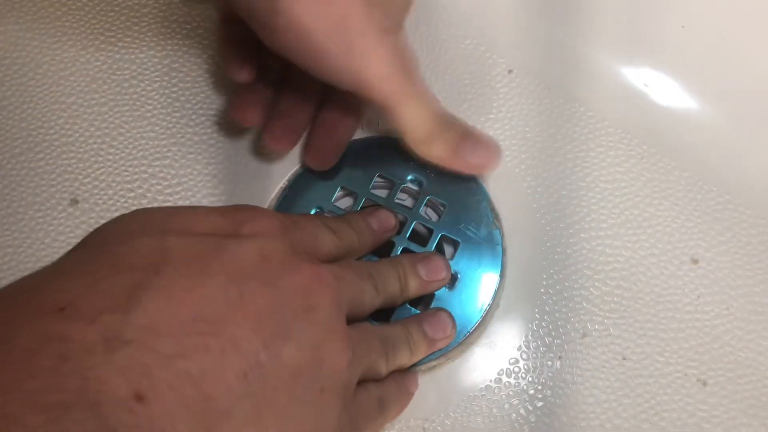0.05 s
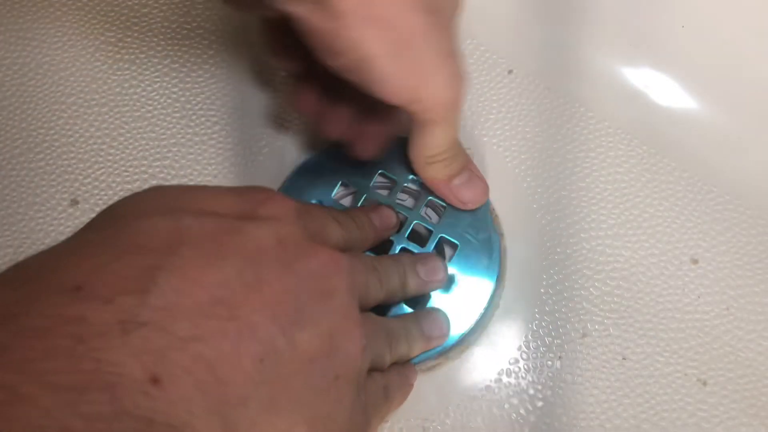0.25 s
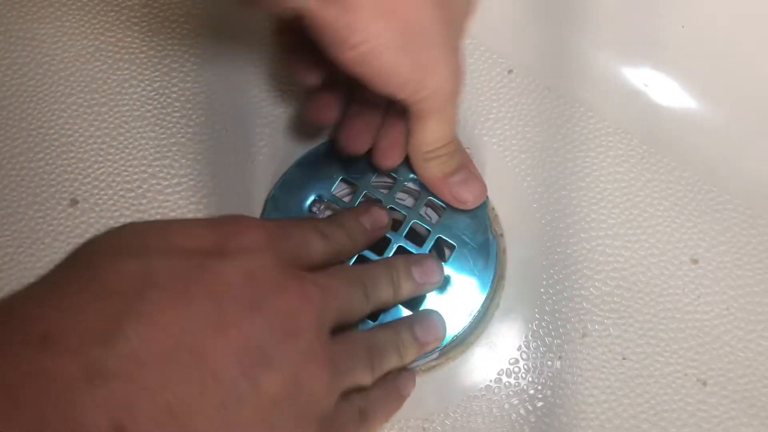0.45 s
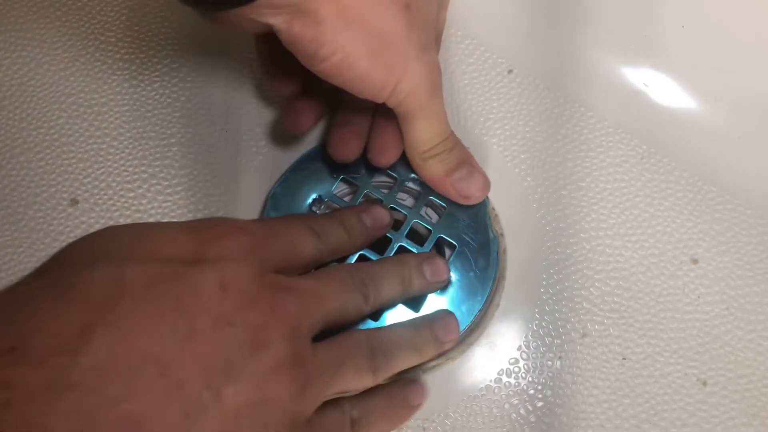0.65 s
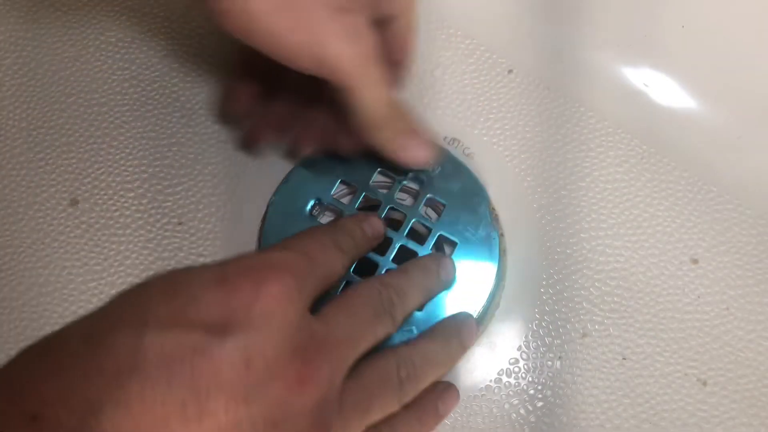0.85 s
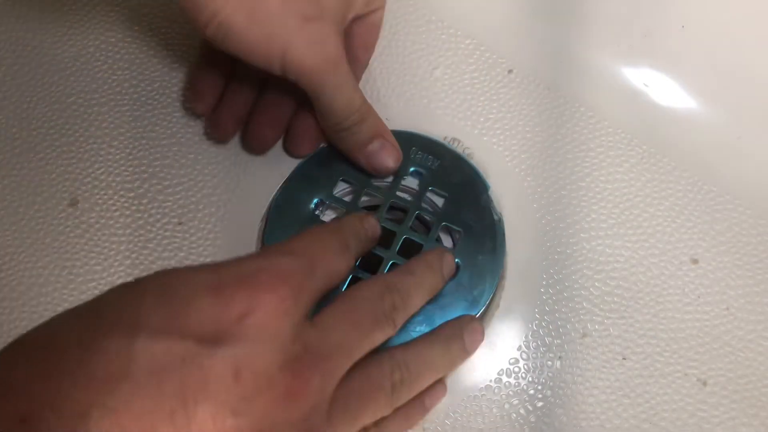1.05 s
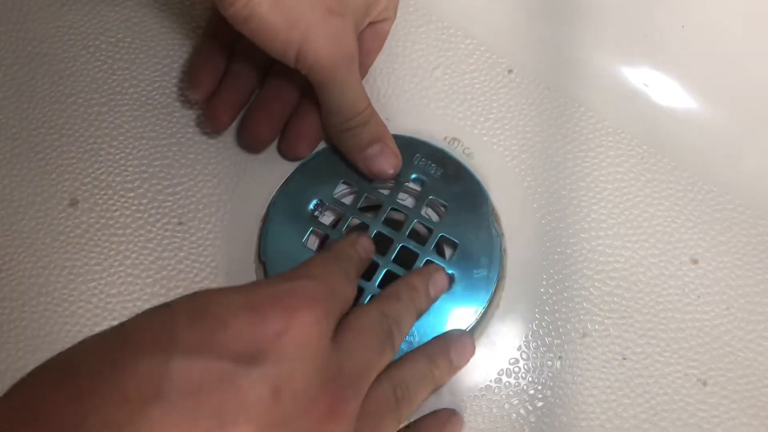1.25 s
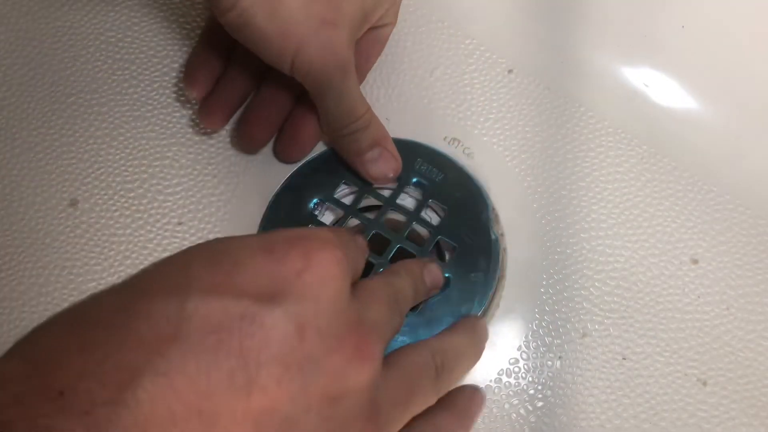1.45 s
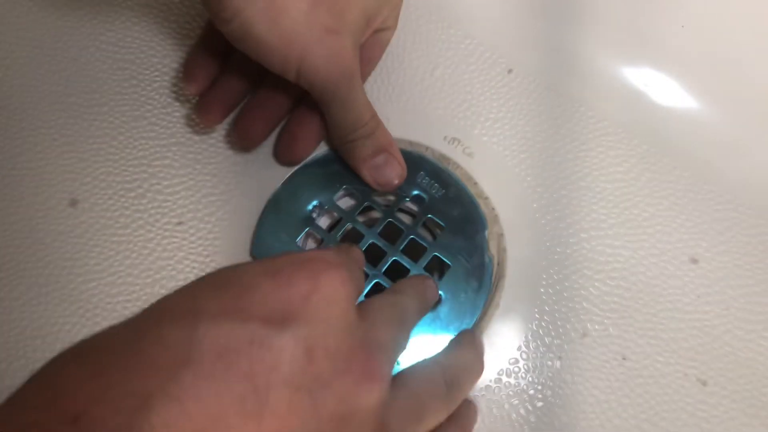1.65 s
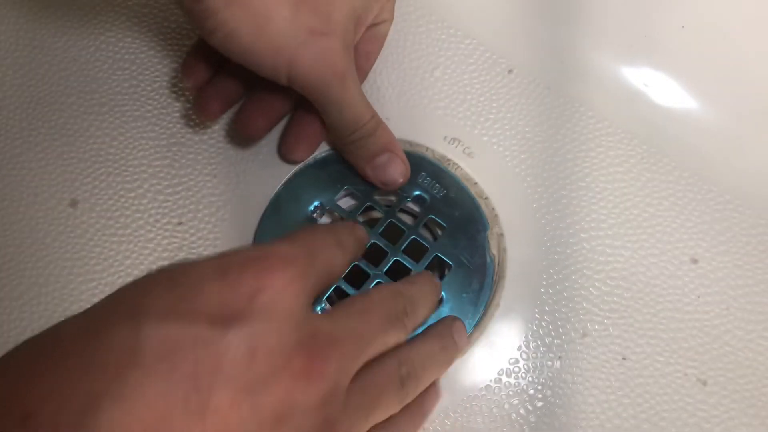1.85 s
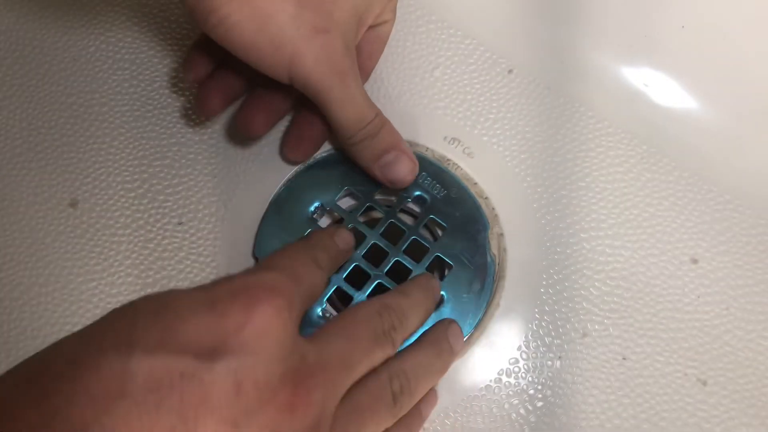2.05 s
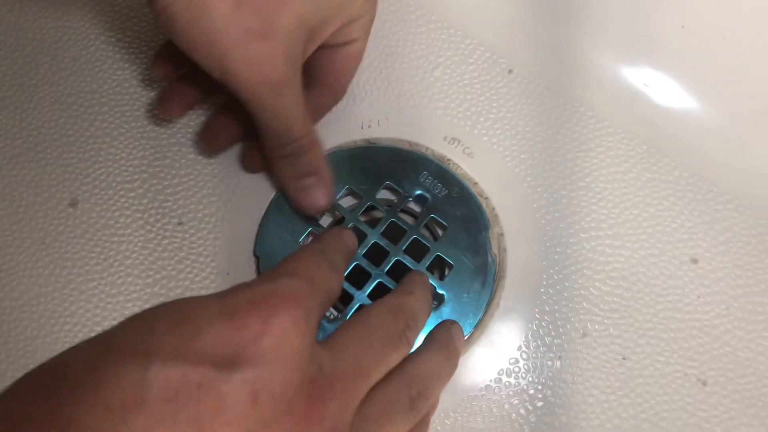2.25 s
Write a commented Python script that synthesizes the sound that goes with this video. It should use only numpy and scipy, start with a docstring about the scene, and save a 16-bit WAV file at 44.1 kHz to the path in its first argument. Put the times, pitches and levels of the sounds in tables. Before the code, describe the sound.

A metal drain grate snaps loudly against a hollow plastic shower tray, then scrapes in short jerks and lands with a softer, boomy clack, amid faint ticks and skin rubs, close-miked in a small tiled bathroom.

```python
"""A hard metallic snap over a hollow plastic knock, then a scrape in jerks, then a softer clack with
a deep boom, among faint ticks: fingers press a metal drain grate into a plastic shower tray. Contacts
are noise cracks plus decaying grate and tray modes, with low tray thuds. Scrapes are jerks of banded
noise, skin slides are soft-edged hiss, and a whistling hiss is noise on a moving pitch. A small tiled
room answers through decaying noise tails, over a low hum of the house and faint air, both coloured noise."""
import sys
import numpy as np
from scipy import signal
from scipy.fft import rfft, irfft, next_fast_len
from scipy.io import wavfile
from scipy.ndimage import map_coordinates

SR = 44100
rng = np.random.default_rng(int(sys.argv[2]) if len(sys.argv) > 2 else 0)


def int16_out(signal):
    """Quantize to a 16-bit WAV file."""
    q = np.round(np.clip(np.atleast_2d(signal).T, -1, 1) * 32767)
    wavfile.write(sys.argv[1], SR, q.astype(np.int16))


N = 101429
T = np.arange(N) / SR


def amp(db):
    """dB to gain."""
    return 10 ** (np.asarray(db) / 20)


def unit(x):
    """Scaled to rms 1."""
    return x / np.sqrt(np.mean(x ** 2) + 1e-20)


def along(points, hz):
    """Interpolates (Hz, value) points on a log frequency axis."""
    point_hz, values = np.transpose(points)
    return np.interp(np.log(hz + 1), np.log(point_hz + 1), values)


def filtered(x, response):
    """Multiplies the spectrum of x by a response of frequency."""
    m = next_fast_len(len(x) + 8192)
    spectrum = rfft(x, m) * response(np.fft.rfftfreq(m, 1 / SR))
    return irfft(spectrum, m)[:len(x)]


def low_pass(x, top_hz, order):
    """Causal Butterworth low-pass."""
    sos = signal.butter(order, min(top_hz, SR / 2.1), fs=SR, output="sos")
    return signal.sosfilt(sos, x)


def band(x, low_hz, top_hz, order):
    """Causal band: second order below, the given order above."""
    return filtered(low_pass(x, top_hz, order), lambda hz: (1j * hz / (low_hz + 1j * hz)) ** 2)


def wobble(knots_per_s):
    """Smooth random curve through normal-distributed knots."""
    knots = rng.standard_normal(int(N * 2000 / SR))
    return map_coordinates(knots, [np.cumsum(knots_per_s + 0 * T) / SR])


def hiss(colour):
    """Coloured noise of rms 1."""
    return unit(filtered(rng.standard_normal(N), lambda hz: amp(along(colour, hz))))


def gate(start_s, length_s, edge_s):
    """Linear rise, hold, linear fall."""
    rise = np.clip((T - start_s) / edge_s + .5, 0, 1)
    fall = np.clip((start_s + length_s - T) / edge_s + .5, 0, 1)
    return rise * fall


def add(out, start_s, x):
    """Mixes x into out from start_s."""
    part = out[round(start_s * SR):][:len(x)]
    part += x[:len(part)]


SCATTER_DB = 3.5  # standard deviation of mode level, blow to blow


def ringing(modes, centre_hz, octaves, rise_cycles, phase_scatter_turns, blur_hz=0):
    """Decaying modes, 6 dB down at the given octaves from the blow's centre; blur makes phase wander."""
    hz, db, t60_s = np.transpose(modes)[:, :, None]
    t = T[:SR // 3]
    db = db - 6 * (np.log2(hz / centre_hz) / octaves) ** 2
    db = db + SCATTER_DB * rng.standard_normal(hz.shape)
    phase = 2 * np.pi * (hz * t + phase_scatter_turns * rng.random(hz.shape))
    if blur_hz:
        steps = rng.standard_normal(phase.shape)
        phase = phase + np.sqrt(2 * np.pi * blur_hz / SR) * np.cumsum(steps, axis=1)
    envelope = amp(db - 60 * t / t60_s) * (1 - np.exp(-t * hz / rise_cycles))
    return np.sum(envelope * np.sin(phase), axis=0)


# Hum level over time. Each row: time in seconds, level in dB.
HUM_LEVEL = [(0, -48), (.7, -50), (1.2, -45), (1.35, -47), (1.6, -45), (1.96, -47.5), (2.3, -42.5)]
# Hum spectrum. Each row: frequency in Hz, relative density in dB per Hz.
HUM_SPECTRUM = [(15, -69), (25, -41.5), (50, 0.5), (108, 5), (160, -7.5), (303, -12.5), (330, -25),
                (424, -19.5), (487, -19.5), (700, -32.5), (910, -95), (1540, -120)]


def house_hum():
    """Low-frequency coloured noise of slowly moving level."""
    level_db = np.interp(T, *np.transpose(HUM_LEVEL))
    return amp(level_db) * hiss(HUM_SPECTRUM)


# Air spectrum. Each row: frequency in Hz, relative density in dB per Hz.
AIR_SPECTRUM = [(290, -34.5), (500, 12.5), (1610, 1.5), (2260, -12), (2650, -10.5), (4050, -5),
                (8420, -13.5), (13800, -13), (16500, -28.5)]
AIR_DB = -67


def air():
    """Faint coloured noise, its level wavering slightly."""
    return amp(AIR_DB + 0.48 * wobble(3.2)) * hiss(AIR_SPECTRUM)


# Room decay. Each row: frequency in Hz, t60 in seconds.
ROOM_DECAY = [(100, 0.54), (300, 0.39), (700, 0.5), (1500, 0.55), (3000, 0.47), (6000, .42), (11000, 0.32),
              (16000, 0.44)]
# Room level. Each row: frequency in Hz, tail level in dB against the direct sound.
ROOM_LEVEL = [(100, -6), (400, -4.5), (1000, -3), (2500, -4.5), (6000, -6.5), (10000, -16), (15000, -15)]


def bathroom(x):
    """Tiled walls: noise tails decay per frequency, a fresh tail for each eighth of a second of input."""
    out, step = np.zeros(N), SR // 8
    for start in range(0, N, step):
        hz, t, z = signal.stft(rng.standard_normal(SR * 3 // 4), SR, nperseg=256)
        fall = amp(-60 * t / along(ROOM_DECAY, hz)[:, None])
        fall /= np.linalg.norm(fall, axis=1, keepdims=True)
        fall *= amp(along(ROOM_LEVEL, hz))[:, None]
        tail = signal.istft(z * fall, SR, nperseg=256)[1] / np.sqrt(128)
        add(out, start / SR + .003, signal.fftconvolve(x[start:start + step], tail))  # 3 ms delay
    return out


# Whistling hiss. Each row: time in seconds, pitch in Hz, width in Hz (knots per second), level in dB.
WHISTLE_PATH = [(0, 1312, 897, -45), (.05, 1348, 595, -44.5), (0.111, 1400, 624, -60),
                (0.162, 1600, 604, -53.5), (0.239, 1800, 336, -59.5), (0.3, 1800, 297.6, -69),
                (2.079, 1656, 298.6, -96.5), (2.16, 1632, 451.6, -63.5), (2.271, 1758, 407, -54),
                (2.3, 1600, 250, -63)]


def whistle():
    """Narrow noise band: two random envelopes on quadrature carriers of moving pitch."""
    time_s, *columns = np.transpose(WHISTLE_PATH)
    pitch_hz, width_hz, level_db = [np.interp(T, time_s, c) for c in columns]
    phase = 2 * np.pi * np.cumsum(pitch_hz) / SR
    return amp(level_db) * (wobble(width_hz) * np.sin(phase) + wobble(width_hz) * np.cos(phase))


# Skin spectrum before tilt. Each row: frequency in Hz, relative density in dB per Hz.
SKIN_SPECTRUM = [(1290, -8), (2200, -6.5), (2600, -8.5), (4030, -7), (5090, -11), (15100, -22),
                 (16000, -20.5)]
# Skin slides. Each row: start in seconds, length in seconds, level in dB before tilt,
# tilt in dB per octave about 6 kHz.
SKIN_SLIDES = [(0.008, 0.025, -50.5, -4.5), (0.029, 0.052, -52, 1.5), (0.095, 0.06, -53, 5.5),
               (0.176, 0.24, -57, -1.5), (0.446, 0.058, -54, 3), (0.646, 0.14, -62.5, -0.6),
               (0.855, 0.085, -43, -2), (0.996, 0.04, -53, 0), (1.099, 0.047, -61, 1),
               (1.151, 0.085, -62.5, 0.5), (1.343, 0.03, -62, 1.5), (1.433, 0.033, -49.5, 1.5),
               (1.873, 0.026, -54, 3), (2.129, 0.014, -58, 5), (2.18, 0.11, -55.5, 0.3)]
SLIDE_EDGE_S = 0.039


def slides():
    """Skin on metal: one fluctuating hiss, gated softly and tilted for each slide."""
    skin = amp(0.71 * wobble(120)) * hiss(SKIN_SPECTRUM)
    out = np.zeros(N)
    for start_s, length_s, db, tilt_db in SKIN_SLIDES:
        tilted = filtered(skin, lambda hz: amp(tilt_db * np.log2((hz + 1) / 6000)))
        out += amp(db) * gate(start_s, length_s, SLIDE_EDGE_S) ** 2 * tilted
    return out


# Rim scrapes. Each row: start in seconds, length in seconds, starting level in dB,
# bottom in Hz, top in Hz.
RIM_SCRAPES = [(.0, 0.092, -44.5, 581, 2860), (0.8586, 0.0053, -26, 1500, 4250),
               (0.8665, 0.0059, -24, 2170, 4240), (0.8763, 0.016, -23, 2170, 4250),
               (0.8894, .008, -25, 1800, 4190), (0.863, 0.085, -30, 345.6, 2650),
               (0.954, 0.039, -43, 300, 1670), (1.5042, 0.0035, -46, 3000, 13060),
               (1.513, 0.0044, -32, 2995, 14000)]
SCRAPE_EDGE_S, GRIT_DB, JERK_FALL_DB = 0.00031, 2.5, 7


def scrapes():
    """The rim scrapes in jerks: gritty noise in a band each, starting hard and easing off."""
    out = np.zeros(N)
    for start_s, length_s, db, low_hz, top_hz in RIM_SCRAPES:
        grit = rng.standard_normal(N) * amp(GRIT_DB * wobble(600))
        fall_db = JERK_FALL_DB * np.clip((T - start_s) / length_s, 0, 1)
        jerk = gate(start_s, length_s, SCRAPE_EDGE_S) * amp(db - fall_db)
        width_gain = np.sqrt(SR / 2 / (top_hz - low_hz))  # offsets the band's narrowness
        out += band(jerk * grit, low_hz, top_hz, order=16) * width_gain
    return out


# Tray modes. Each row: frequency in Hz, relative level in dB, t60 in seconds.
TRAY_MODES = [(107.6, 8, 0.21), (138, 13.5, 0.1), (200, 5, .09), (292.3, 6, 0.13), (392, -1.5, 0.079),
              (498, 0, 0.21), (533, 1, 0.098), (578.7, -1.5, 0.13), (723, 1, 0.17), (883, -2, 0.078),
              (1048, -2, 0.14), (1234, 4, 0.14), (1370, -2, 0.07), (1600, 3, 0.025)]
# Low thuds of the tray, many under the grate blows. Each row: start in seconds,
# level in dB added to the modes, centre in Hz.
TRAY_THUDS = [(0.099, -39, 132), (0.258, -18.5, 91), (0.774, -35.5, 141), (0.872, -33, 144),
              (0.929, -33, 132), (1.02, -30.5, 136), (1.388, -42.5, 139), (1.518, -12, 138),
              (1.69, -34.5, 142), (1.944, -45.5, 141.8), (2.193, -33, 131.6), (2.251, -43, 104)]
THUD_OCTAVES, THUD_RISE_CYCLES = 0.23, 1


def thuds():
    """Low thuds: tray modes near a low centre ring, all starting in phase."""
    tray = np.zeros(N)
    for start_s, db, centre_hz in TRAY_THUDS:
        notes = ringing(TRAY_MODES, centre_hz, THUD_OCTAVES, THUD_RISE_CYCLES, phase_scatter_turns=0)
        add(tray, start_s, amp(db) * notes)
    return tray


# Grate modes. Each row: frequency in Hz, relative level in dB, t60 in seconds.
GRATE_MODES = [(3103, 2.5, 0.025), (3800, 3.5, 0.024), (4160, -2.5, 0.02), (4910, 3, 0.024),
               (6436, 5.5, 0.03), (8000, 0.5, 0.039), (9500, -14, 0.023), (4960, -4.5, 0.0081),
               (10600, -17.5, 0.033), (11300, -12, .04), (13980, -5.5, .03)]
# Grate contacts. Each row: start in seconds, crack level in dB, crack top in Hz,
# grate ring level in dB added to the modes, ring centre in Hz, tray note level in dB added to the modes,
# dull knock level in dB, knock centre in Hz.
GRATE_TAPS = [(0.01, -41.5, 4000, -40.5, 2840, -70, -41.5, 533),
              (0.2455, -1.5, 13000, -18.5, 4410, -16, -10.5, 525),
              (0.586, -51, 9050, -74, 8000, -59, -80, 200), (0.622, -51, 2090, -83, 3100, -58, -53, 870),
              (0.7743, -30.5, 8300, -37.5, 4250, -32.5, -28.5, 704),
              (.889, -32, 12000, -41, 8000, -33.5, -31, 905),
              (.916, -58, 11900, -46, 8000, -39.5, -27.5, 647),
              (0.974, -42, 13560, -58.5, 11930, -37, -31, 454),
              (1.389, -31, 5400, -86, 8000, -55, -40.5, 830),
              (1.4421, -42.5, 8850, -50.5, 5000, -61, -48.5, 895),
              (1.5091, -33.5, 11300, -27, 9500, -23.5, -19, 282),
              (1.5121, -24, 5000, -28, 4240, -23, -19.5, 750),
              (1.652, -51, 14770, -66, 14000, -66, -75, 498), (1.6999, -54, 5000, -62, 3920, -64, -53, 714),
              (2.0407, -56, 14800, -77, 11960, -78, -69, 305),
              (2.09, -46.5, 4980, -68, 3500, -65.5, -65, 1675)]
CRACK_T60_S, CRACK_RISE_S = 0.013, 0.00083
RING_OCTAVES, RING_RISE_CYCLES, RING_BLUR_HZ = 0.64, 1.1, 25.1  # fingers smear the notes
KNOCK_OCTAVES, KNOCK_RISE_CYCLES, TRAY_BLUR_HZ = 0.89, 1, 16
DULL_T60_S, DULL_BOTTOM, DULL_TOP = 0.15, 0.18, 1.26  # unresolved tray modes; edges / knock centre
RING_ROOM_DB = -9.5  # the ring reaches the walls weakly


def taps():
    """Contacts: noise crack, grate ring, tray notes, dull knock. Returns direct sound and room feed,
    where each crack is one low-passed impulse of the same energy before the filter."""
    tray, ring, cracks, snaps = np.zeros((4, N))
    t = T[:SR // 2]
    for start_s, crack_db, top_hz, ring_db, ring_hz, notes_db, dull_db, knock_hz in GRATE_TAPS:
        crack_envelope = amp(crack_db - 60 * t / CRACK_T60_S) * (1 - np.exp(-t / CRACK_RISE_S))
        crack = rng.standard_normal(len(t)) * crack_envelope
        snap = np.linalg.norm(crack) * (t == 0)
        add(cracks, start_s, low_pass(crack, top_hz, order=2))
        add(snaps, start_s, low_pass(snap, top_hz, order=2))

        dull_noise = rng.standard_normal(len(t))
        dull = unit(band(dull_noise, DULL_BOTTOM * knock_hz, DULL_TOP * knock_hz, order=2))
        dull_rise = 1 - np.exp(-t * knock_hz / KNOCK_RISE_CYCLES)
        add(tray, start_s, amp(dull_db - 60 * t / DULL_T60_S) * dull_rise * dull)

        grate = ringing(GRATE_MODES, ring_hz, RING_OCTAVES, RING_RISE_CYCLES, 0.94, RING_BLUR_HZ)
        add(ring, start_s, amp(ring_db) * grate)
        notes = ringing(TRAY_MODES, knock_hz, KNOCK_OCTAVES, KNOCK_RISE_CYCLES, 0.22, TRAY_BLUR_HZ)
        add(tray, start_s, amp(notes_db) * notes)
    return tray + cracks + ring, tray + snaps + amp(RING_ROOM_DB) * ring


def scene():
    """Hands and grate in the room, over hum and air."""
    background = house_hum() + air()
    rubbing = whistle() + slides() + scrapes()
    thudding = thuds()
    tapped, tapped_to_room = taps()
    direct = rubbing + thudding + tapped
    return (background + direct + bathroom(rubbing + thudding + tapped_to_room))[None]


LOW_CUT_HZ, SHELF_HZ, SHELF_DB, TOP_HZ = 65, 15900, -22.5, 16800


def record(dry):
    """Microphone: third-order bass cut, a step down above SHELF_HZ, silence from TOP_HZ."""
    def response(hz):
        bass_cut = (1j * hz / (LOW_CUT_HZ + 1j * hz)) ** 3
        shelf = np.where(hz > SHELF_HZ, amp(SHELF_DB), 1)
        return bass_cut * shelf * (hz < TOP_HZ)
    return filtered(dry[0], response)[None]


dry = scene()
out = record(dry)
int16_out(out)
```